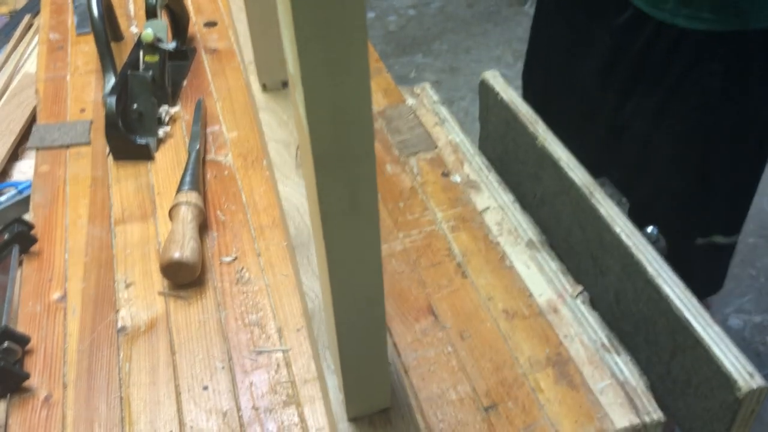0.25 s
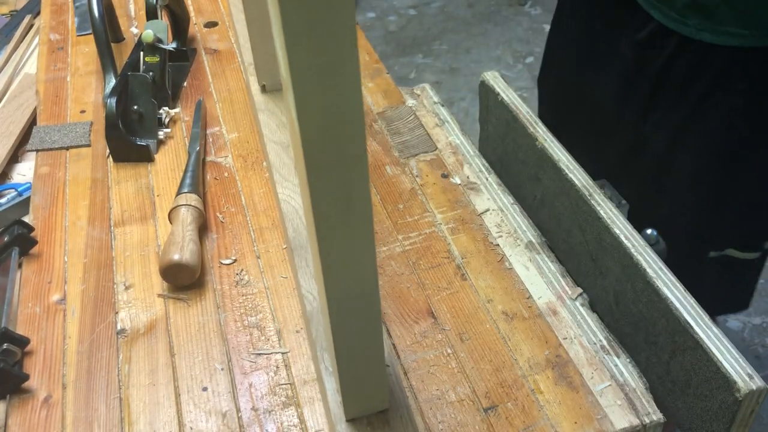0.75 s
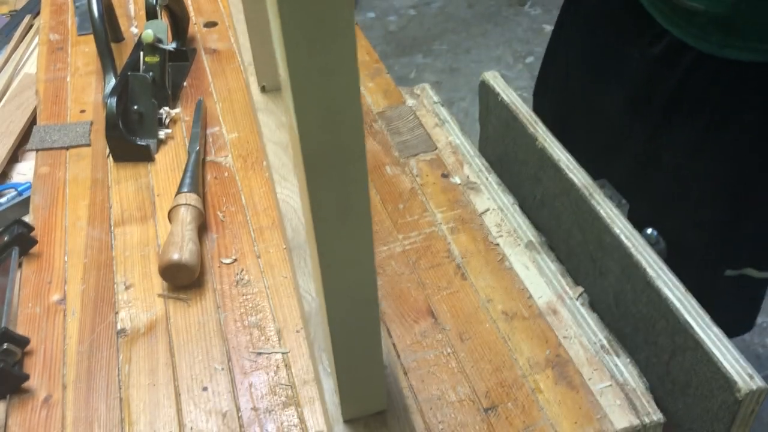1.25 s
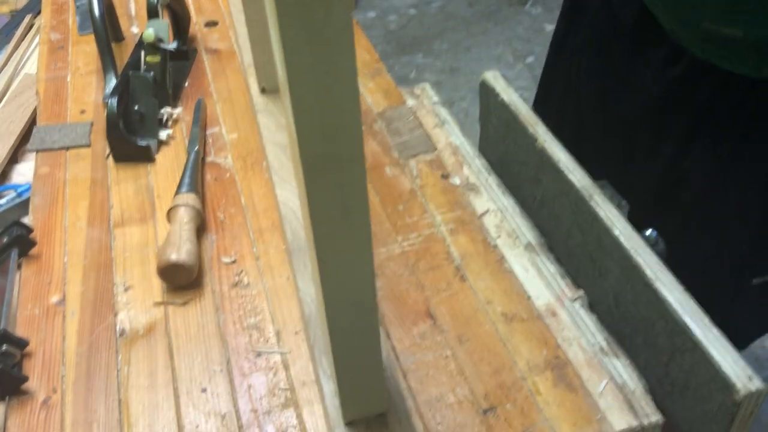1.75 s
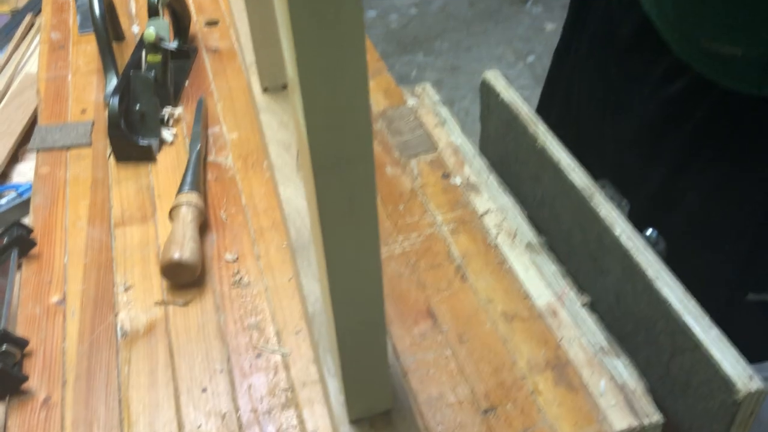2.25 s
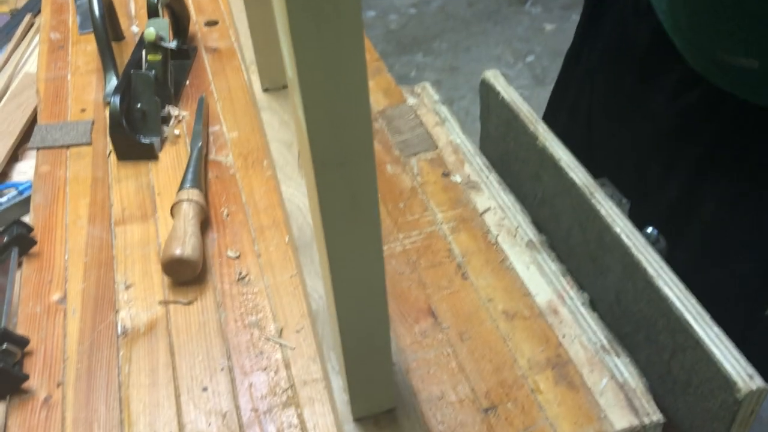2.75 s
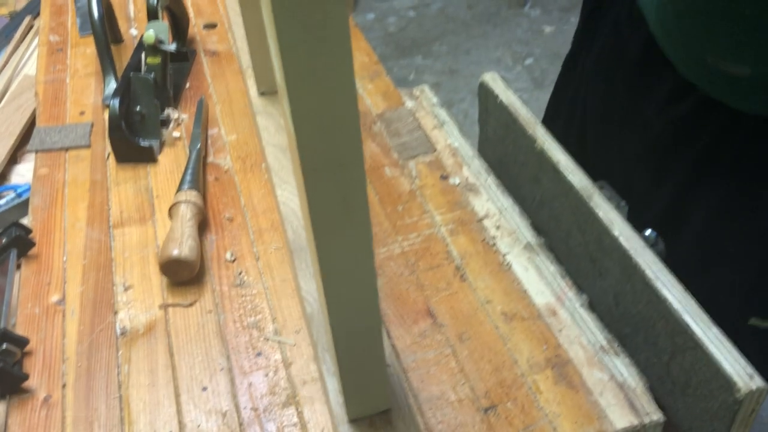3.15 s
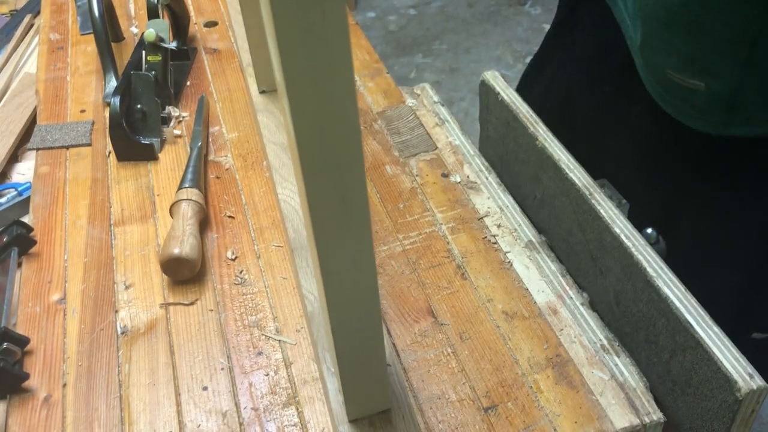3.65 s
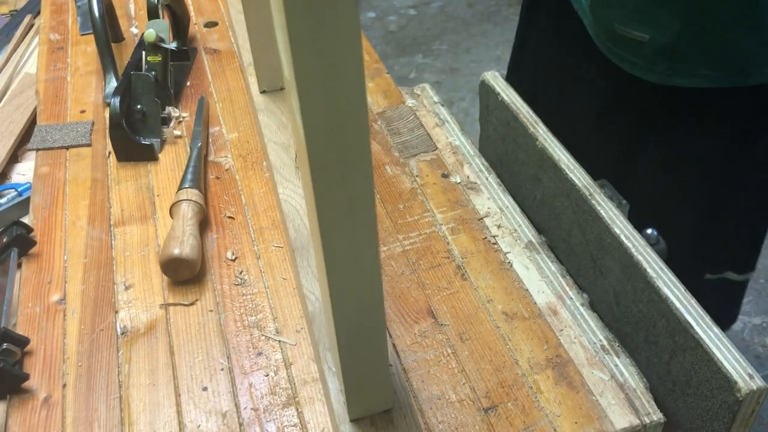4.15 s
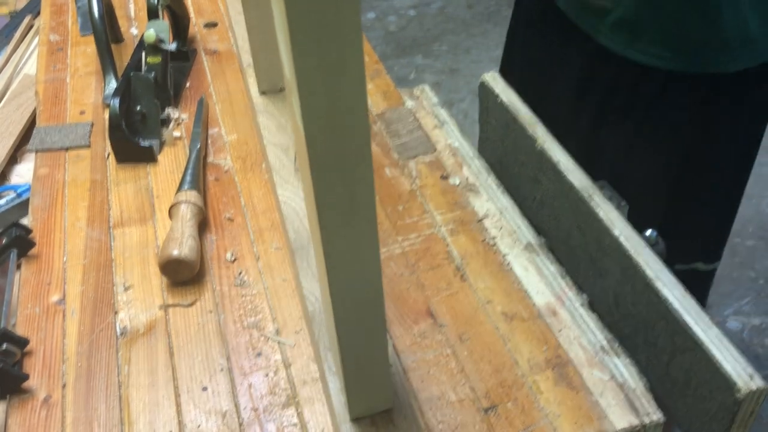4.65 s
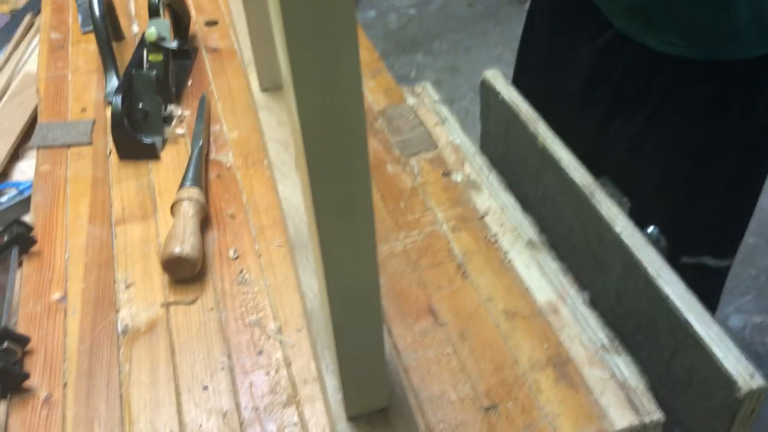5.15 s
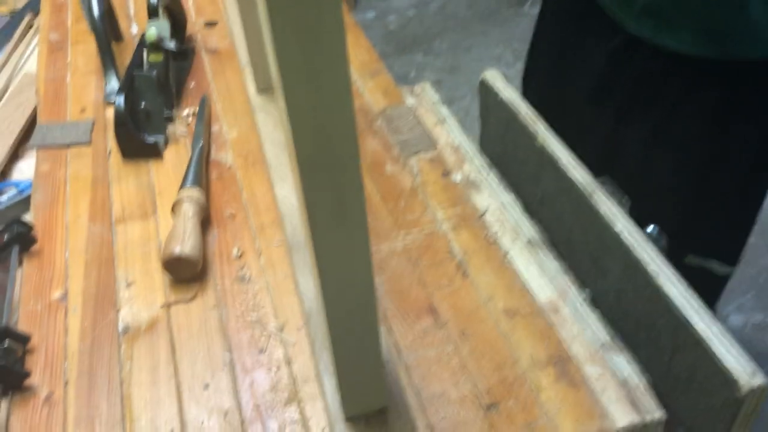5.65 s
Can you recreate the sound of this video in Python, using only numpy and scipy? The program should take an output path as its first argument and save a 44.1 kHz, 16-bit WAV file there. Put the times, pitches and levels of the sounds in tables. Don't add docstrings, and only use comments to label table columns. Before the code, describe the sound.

Loud cracking mallet blows on wood, a run of six, a pause, then three more, with bench boom and faint tool rattle.

```python
import sys
import numpy as np
from scipy import signal
from scipy.io import wavfile
from scipy.ndimage import uniform_filter1d, minimum_filter1d

SR = 44100
rng = np.random.default_rng(int(sys.argv[2]) if len(sys.argv) > 2 else 0)


def generate_wav(sig):
    pcm = np.round(np.clip(np.atleast_2d(sig).T, -1, 1) * 32767).astype(np.int16)
    wavfile.write(sys.argv[1], SR, pcm)


def natural_amplitude(level_db):
    exponent = np.asarray(level_db, float) / 20
    return 10 ** exponent


N = 259749


def at_hz(points, hz):
    points = np.array(points)
    return np.interp(np.log(hz), np.log(points[:, 0]), points[:, 1])


def rms_one(x):
    return x / np.sqrt(np.mean(x ** 2) + 1e-20)


def resonance(x, hz, width_hz):
    r = np.exp(-np.pi * width_hz / SR)
    gain = (1 - r * r) / 2
    return signal.lfilter([gain, 0, -gain], [1, -2 * r * np.cos(2 * np.pi * hz / SR), r * r], x)


def ring(clicks, hz, t60):
    r = natural_amplitude(-60 / (t60 * SR))
    w = 2 * np.pi * hz / SR
    return signal.lfilter([0, np.sin(w)], [1, -2 * r * np.cos(w), r * r], clicks + 1e-18)


def waver(hz):
    slow = signal.sosfilt(signal.butter(2, hz, fs=SR, output="sos"), rng.standard_normal(N))
    return 0.4 + 0.7 * rms_one(slow)


BAND_EDGES = 32 * 2 ** np.arange(0, 9.1, 1 / 3)


def bands(rows, size):
    settle = 4000
    white = rng.standard_normal((2, rows, size + settle))
    for k, (low, high) in enumerate(zip(BAND_EDGES, BAND_EDGES[1:])):
        sos = signal.butter(3, [low, high], "band", fs=SR, output="sos")
        noise = signal.sosfilt(sos, white[k % 2])[:, settle:]
        yield np.sqrt(low * high), rms_one(noise)


# (time [s], force [dB], hardness of contact [dB], direct crack [dB], direct knock [dB])
BLOWS = [
    (-0.150, -0.5, -13, 6, -9),
    (0.2947, -2, 2, 12.5, -5.5),
    (1.0079, -3, -2, 22.5, -5.5),
    (1.6790, 0.5, -1, 20.5, -11),
    (2.1768, 0, 1.5, 13, -12.5),
    (2.6480, -0.5, 2.5, 30, 4.5),
    (3.1000, 1, 0.5, 12, -3.5),
    (4.665, -7.5, -4, 11, -26),
    (5.0930, -2.5, 0.5, 22, -1.5),
    (5.5697, -2, -1.5, 30.5, 4),
]
STRUCK_AT = [1, 0, 4, 1, 1, 1, 1, 3, 2, 5]
# (frequency [Hz], level [dB], share of hardness [0-1])
COLOUR = [
    (195, -9, 0.01),
    (1400, -3.5, 0.2),
    (4000, -5.5, 0.6),
    (10500, -17.5, 0.95),
]
# (body near 1.4 kHz [dB], clack near 4 kHz [dB], favoured knock [Hz])
SPOT_VOICE = [(2, -3.5, 1900), (-0.23, 0, 1400), (2.5, -2.5, 2200), (-5, -1, 3600), (5, 1.5, 770),
              (3.5, 3.5, 3100)]


def colour_db(hz):
    points, table = np.array(COLOUR), np.array(BLOWS)
    force, hardness = table[:, 1:2], table[:, 2:3]
    parts = points[:, 1] + force + points[:, 2] * hardness
    parts[:, 1:3] += np.array(SPOT_VOICE)[STRUCK_AT, :2]
    return np.array([np.interp(np.log(hz), np.log(points[:, 0]), row) for row in parts])


# (frequency [Hz], width [Hz], level [dB])
SPOTS = [
    [(151, 14, 1.5), (178, 19, -6), (436, 270, -4.5), (1300, 120, 2), (1700, 150, -1.5), (1870, 57, 0),
     (3420, 250, 5)],
    [(144, 18, -6), (178, 69, -4.5), (327.2, 120, 1), (538, 54, -0.5), (705, 180, -2), (3600, 100, 0.5)],
    [(130, 13, -2), (177, 8.6, 8), (259, 510, 2.5), (1356, 120, 1), (2170, 140, 2.5), (3580, 1200, -2)],
    [(140, 140, -6), (179, 53, 4.5), (276, 50, 8.5), (423, 140, 12), (715, 170, 0.5), (7460, 710, 0.5)],
    [(139, 29, 9), (184, 54, -3.5), (1042.6, 80, -10.5), (1628, 100, 2.5), (1941, 76, 2.5), (7700, 500, -8)],
    [(287, 67, 9), (584, 160, 1.5), (2810, 400, -3.5)],
]
# (frequency [Hz], width [Hz], level [dB])
BENCH = [(151.9, 9.1, 0.4), (174, 7.4, -1), (283.7, 7.3, -1), (443, 23, -5), (763, 6.8, -4)]
# (frequency [Hz], level [dB])
CRACK = [(100, -28), (400, -8), (1000, 1.5), (2000, 8.5), (4000, 8), (8000, 18), (16000, 22)]
# (frequency [Hz], level [dB])
ROOM = [(40, -36), (62, -28), (90, -10.5), (2000, -3), (3000, -8.5), (6000, -3.5), (11000, 0),
        (15000, -2.5)]
# (frequency [Hz], time to fall 60 dB [s])
ROOM_T60 = [(60, .48), (160, .47), (420, .43), (2900, .41), (5500, .37), (8000, .33), (11000, .29),
            (15000, .27)]


def blows():
    size = SR * 3 // 4
    t, table, sound = np.arange(size) / SR, np.array(BLOWS), 0
    late_db, late_longer = -38, 2.2
    lull_db, lull_ends_hz, first_wall_s, wall_spread_s = -2.5, 5000, 0.005, 0.0072
    before_wall = 1 / (1 + np.exp(np.minimum((t - first_wall_s) / wall_spread_s, 50)))
    for hz, noise in bands(len(BLOWS), size):
        crack_t60 = 0.011 + 18.0 / hz
        crack_db = table[:, 3:4] + at_hz(CRACK, hz) - 60 * t / crack_t60
        crack = natural_amplitude(crack_db) * np.minimum(t / (0.0012 + 1 / hz), 1)
        fall_db = -60 * t / at_hz(ROOM_T60, hz)
        dying = natural_amplitude(fall_db) + natural_amplitude(late_db + fall_db / late_longer)
        building = 1 - np.exp(-t / (0.0017 + 0.64 / hz))
        lull = natural_amplitude(lull_db / (1 + (hz / lull_ends_hz) ** 2) * before_wall)
        room = natural_amplitude(at_hz(ROOM, hz)) * dying * building * lull
        level = natural_amplitude(colour_db(hz) - 9)[:, None]
        sound = sound + level * noise * np.sqrt(crack ** 2 + room ** 2)
    out = np.zeros(N + 2 * SR)
    fade_out = np.minimum((size - np.arange(size)) / 2000, 1)
    for s, spot, x in zip(table[:, 0], STRUCK_AT, sound):
        x = x + sum(natural_amplitude(db) * resonance(x, hz, width) for hz, width, db in SPOTS[spot] + BENCH)
        start = SR + round(s * SR)
        out[start:start + size] += x * fade_out
    bench_cut = signal.butter(4, 72, "high", fs=SR, output="sos")
    return signal.sosfilt(bench_cut, out)[SR:SR + N]


# (frequency [Hz], width [Hz], level [dB])
FRAME = [(705, 210, -3), (1390, 210, -1.5), (1885, 340, 3), (2608, 460, 2), (3081, 480, 2)]


def knocks():
    level_db, fall_db_per_oct, scatter_size_db = 5, 1.5, 2.2
    second_s, second_db = 0.0028, 3.0
    table = np.array(BLOWS)[1:]
    at = (table[:, 0] * SR).astype(int)
    signs = rng.choice([-1, 1], (len(at), len(FRAME)))
    scatter_db = scatter_size_db * rng.standard_normal((len(at), len(FRAME)))
    favoured_hz = np.array(SPOT_VOICE)[STRUCK_AT[1:], 2]
    out = np.zeros(N)
    for k, (hz, width, db) in enumerate(FRAME):
        off_db = fall_db_per_oct * np.abs(np.log2(hz / favoured_hz))
        knock_db = table[:, 4] + db - off_db + scatter_db[:, k] + level_db
        clicks = np.zeros(N)
        clicks[at] = signs[:, k] * natural_amplitude(knock_db) * SR / width
        whole_cycles = round(second_s * hz)
        clicks += natural_amplitude(second_db) * np.roll(clicks, round(whole_cycles / hz * SR))
        out += resonance(resonance(clicks + 1e-18, hz, width), hz, width)
    return out


# (frequency [Hz], level [dB], time to fall 60 dB [s])
THUMP = [(90.6, -7.5, 0.083), (142, 1.2, 0.21), (176.7, -0.6, 0.28), (284.2, -5, 0.18)]


def thump():
    level_db, lag_s = -8.5, 0.015
    s, force_db = np.array(BLOWS)[1:, :2].T
    scatter_db = 1.0 * rng.standard_normal((len(s), len(THUMP)))
    at = ((s + lag_s) * SR).astype(int)
    out = 0
    for k, (hz, db, t60) in enumerate(THUMP):
        clicks = np.zeros(N)
        clicks[at] = natural_amplitude(level_db + db + force_db + scatter_db[:, k])
        out = out + ring(clicks, hz, t60)
    return signal.sosfilt(signal.butter(2, [70, 350], "band", fs=SR, output="sos"), out)


TOOL_HZ = [3786, 5930, 7245, 8280, 10580, 11480, 12430, 13250]
TOOL_DB = [-9, -9, -0.5, -3, -2.5, -4, -4.5, -6.5]
TOOL_T60 = [.33, .3, .34, .3, .3, .3, .27, .25]
# (time [s], level [dB], lean toward small bright parts [dB per octave])
HOPS = [(1.055, -33.5, -10), (1.736, -34, -5.5), (1.756, -31, -8), (2.239, -27.5, -8),
        (2.704, -26.5, -10.5), (3.126, -43.5, 1.5), (3.165, -25.5, -10.5), (5.624, -48, -6)]
# (time [s], frequency [Hz], level [dB], time to fall 60 dB [s])
FAR_RING = [(0.32, 3370, -30, 0.5), (0.32, 1325, -28, 0.4), (1.01, 468, -43, 1.6), (1.01, 1508, -55, 1.3),
            (5.63, 8700, -48, 0.45), (5.63, 10400, -52, .6), (5.63, 13800, -54, 0.6)]


def tools():
    out = np.zeros(N)
    at_s, hop_db, lean_db = np.transpose(HOPS)
    scatter_db = 1.5 * rng.standard_normal((len(HOPS), len(TOOL_HZ)))
    for k, (hz, db, t60) in enumerate(zip(TOOL_HZ, TOOL_DB, TOOL_T60)):
        tilt_db = lean_db * np.log2(hz / TOOL_HZ[2])
        clicks = np.zeros(N)
        clicks[(at_s * SR).astype(int)] = natural_amplitude(hop_db + db + tilt_db + scatter_db[:, k])
        out += ring(clicks, hz, t60) * waver(45.0)
    for s, hz, db, t60 in FAR_RING:
        click = np.arange(N) == round(s * SR)
        out += natural_amplitude(db) * ring(click, hz, t60) * waver(hz / 100)
    return out


# (time [s], peak level [dB], frequency [Hz], room level [dB])
TICKS = [(0.92, -54, 4000, -11.5), (1.529, -56.5, 7440, -20), (2.049, -58.5, 11260, -11),
         (3.58, -37, 4160, -21.5), (3.578, -54, 14140, -16), (3.86, -56, 4860, -1), (4.98, -54, 6000, -11)]


def ticks():
    t60, room_t60, wide_db, spread = 0.008, 0.32, -16, 0.26
    out, t = np.zeros(N), np.arange(SR // 4) / SR
    for (s, db, hz, room_db), noise in zip(TICKS, rng.standard_normal((len(TICKS), len(t)))):
        pitched = resonance(resonance(noise, hz, spread * hz), hz, spread * hz)
        bright = natural_amplitude(wide_db) * np.diff(noise, prepend=0) + pitched
        dying = natural_amplitude(-60 * t / t60) + natural_amplitude(room_db - 60 * t / room_t60)
        out[round(s * SR):][:len(t)] += natural_amplitude(db) * bright * dying
    return out


# (frequency [Hz], level per Hz [dB])
HUM = [(15, -30), (28, -0.5), (130, 0), (190, -6.5), (440, -11.5), (754, -21), (1890, -30), (16000, -44.5)]
# (frequency [Hz], width [Hz], level [dB])
HUM_TONES = [(130, 4.8, -60), (176.4, 6, -69), (222, 5.4, -67), (266, 1.7, -67), (390, 16, -72),
             (468, 3.8, -73)]


def hum():
    level_db, duck_db, recover_s = -59.5, -4, 0.4
    air = sum(natural_amplitude(at_hz(HUM, hz)) * np.sqrt(hz) * noise[0] for hz, noise in bands(1, N))
    white = rng.standard_normal(N)
    tones = 0
    for hz, width, db in HUM_TONES:
        tones = tones + natural_amplitude(db) * rms_one(resonance(resonance(white, hz, width), hz, width))
    t, times = np.arange(N) / SR, np.array(BLOWS)[:, 0]
    since = t - times[np.searchsorted(times, t) - 1]
    dip = natural_amplitude(duck_db * np.exp(-since / recover_s))
    return dip * (natural_amplitude(level_db) * rms_one(air) + tones)


def scene():
    return (blows() + knocks() + thump() + tools() + ticks() + hum())[None]


def limiter(x):
    top_db, width, release_s = -4.2, 40, 0.011
    melt = np.arange(N) / SR / release_s
    over_db = np.maximum(20 * np.log10(np.abs(x) + 1e-9) - top_db, 1e-6)
    held_db = np.exp(np.maximum.accumulate(np.log(over_db) + melt) - melt)
    widened_db = -minimum_filter1d(-held_db, width)
    return x * natural_amplitude(-uniform_filter1d(widened_db, width))


def ahead(x):
    lead = 990
    ghost_db, half_db, smear_db, grow_db, ring_db = -34.5, -44, -69, 14, -6.5
    smear = signal.sosfilt(signal.butter(8, 3400, fs=SR, output="sos"), rng.standard_normal(lead))
    taps = rms_one(smear) * natural_amplitude(smear_db + grow_db * np.arange(lead) / lead)
    dull_click = signal.lfilter(*signal.butter(1, 8000, fs=SR), np.arange(40) == 0)
    taps[:40] += natural_amplitude(ghost_db) * dull_click
    taps[lead // 2] += natural_amplitude(half_db)
    early = signal.fftconvolve(x, taps)[lead - 1:][:N]
    backward_ring = resonance(x[::-1], 3050, 60)[::-1]
    return early + natural_amplitude(ring_db) * backward_ring


def top_cut(x):
    cutoff_hz, opens_db, top_db = 15950, -36, -9
    low = signal.sosfilt(signal.ellip(8, 0.3, 45, cutoff_hz - 150, fs=SR, output="sos"), x)
    top = signal.sosfilt(signal.ellip(8, 0.3, 45, cutoff_hz, "high", fs=SR, output="sos"), x)
    loudness = np.sqrt(np.abs(uniform_filter1d(top ** 2, size=128))) / natural_amplitude(opens_db)
    return low + natural_amplitude(top_db) * top * np.minimum(loudness, 1) ** 3


def low_pass(x):
    return signal.sosfilt(signal.butter(12, 17000, fs=SR, output="sos"), x)


def record(dry):
    bass_cut = signal.butter(3, 58, "high", fs=SR, output="sos")
    x = signal.sosfilt(bass_cut, limiter(dry[0]))
    mix = top_cut(x + ahead(x))[None]
    return low_pass(mix)


dry = scene()
out = record(dry)
generate_wav(out)
```